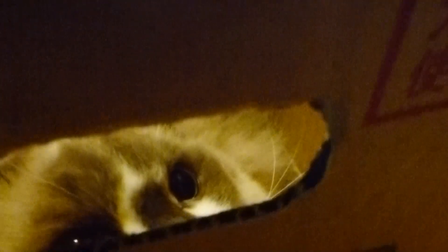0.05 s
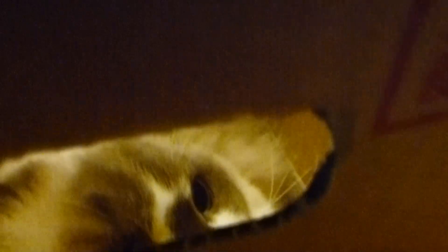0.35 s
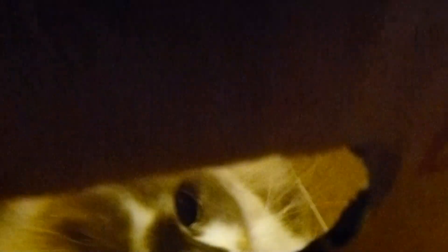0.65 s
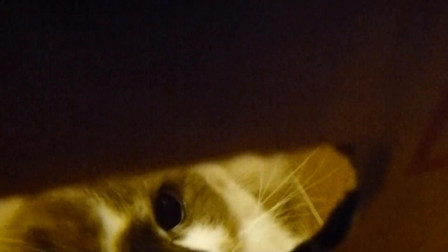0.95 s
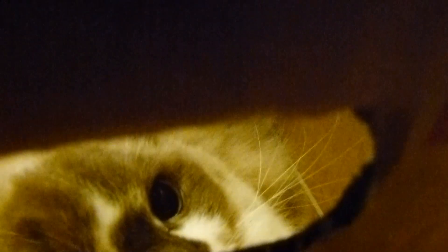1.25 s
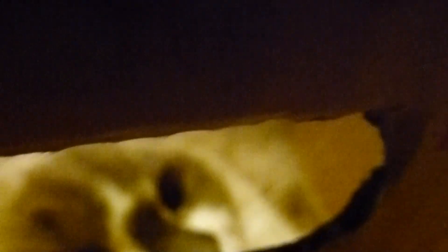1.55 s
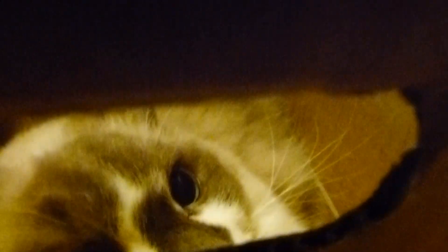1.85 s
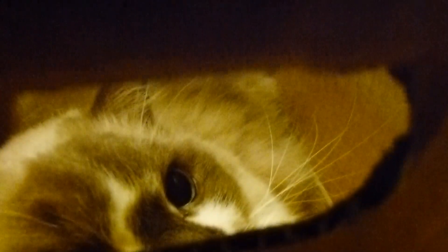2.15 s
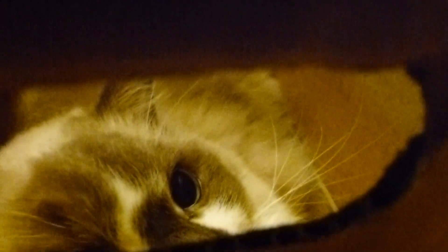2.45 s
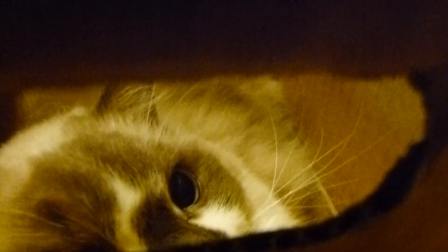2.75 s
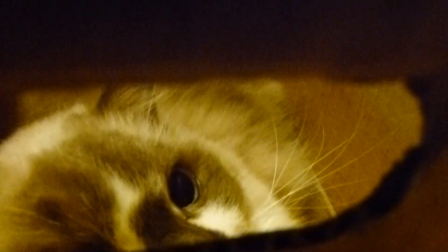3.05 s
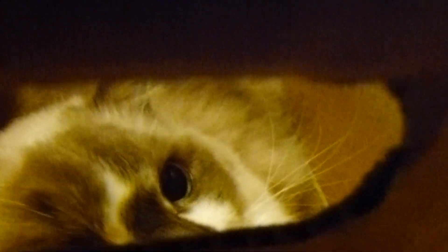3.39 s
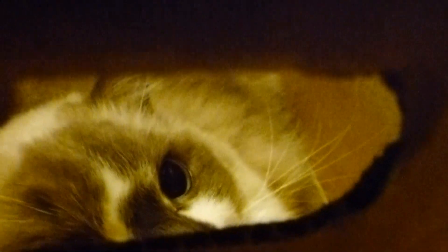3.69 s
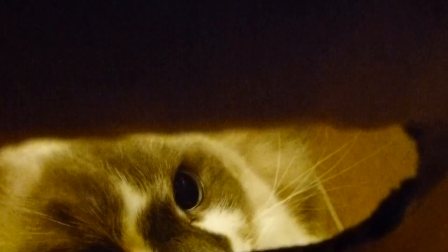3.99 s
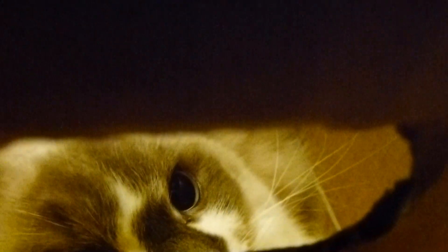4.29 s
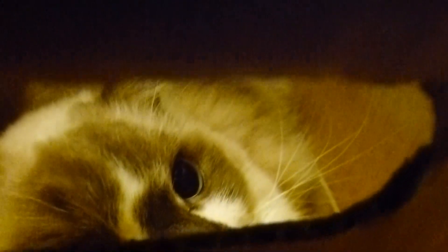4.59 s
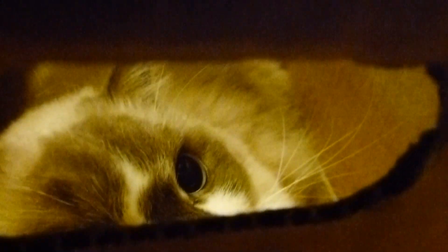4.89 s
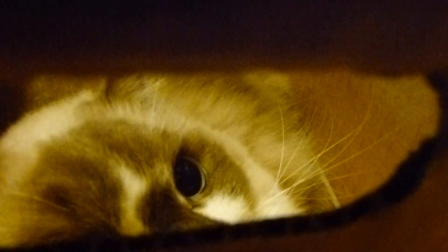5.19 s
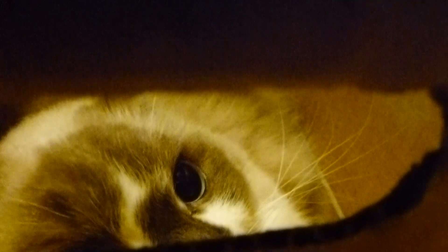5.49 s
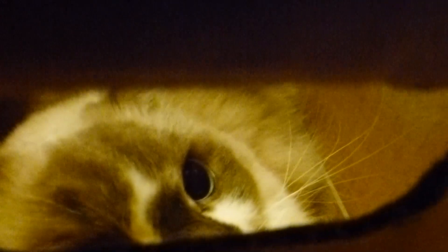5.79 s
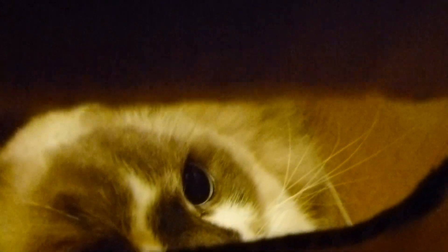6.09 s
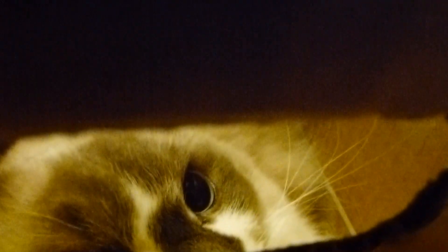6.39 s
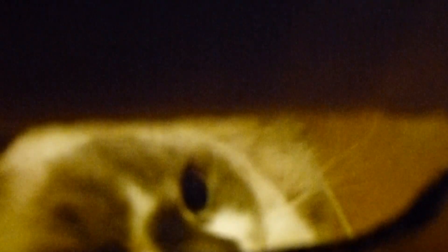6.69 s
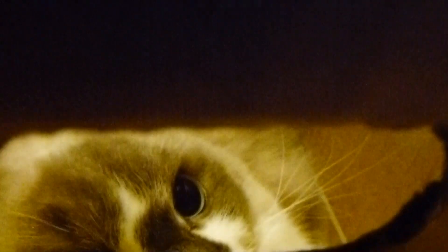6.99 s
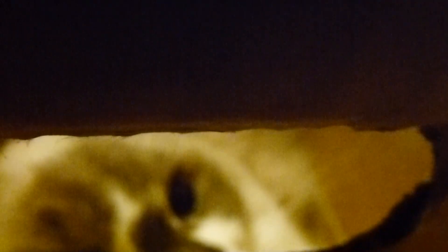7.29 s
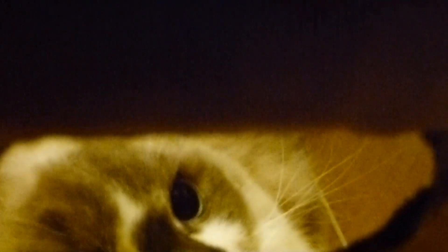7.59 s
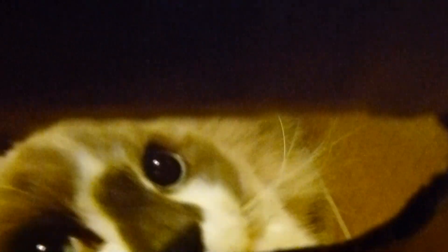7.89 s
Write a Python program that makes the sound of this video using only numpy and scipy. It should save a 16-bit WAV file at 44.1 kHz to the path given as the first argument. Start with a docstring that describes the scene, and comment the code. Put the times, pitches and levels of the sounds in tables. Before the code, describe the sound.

A cat shifts inside a cardboard box, its paws thumping and scraping the walls in short irregular bursts.

```python
"""A cat shifts about inside a cardboard box, close by, in a quiet room.
Its paws thump the walls, which ring briefly. Paws and flank drag over the cardboard, sticking
and slipping in short rasping strokes. Now and then a claw snags with a snap, and fur swishes
along the edge of the hole. A steady room hush lies under it all."""
import sys
import numpy as np
from scipy import signal
from scipy.fft import rfft, irfft
from scipy.io import wavfile
from scipy.ndimage import uniform_filter1d

SR = 44100
rng = np.random.default_rng(int(sys.argv[2]) if len(sys.argv) > 2 else 0)


def wrap_up_sound(samples):
    """Save the sound to the file named by the first command line argument, as 16-bit audio."""
    columns = np.atleast_2d(samples).T
    # keep every value between -1 and 1, then stretch to whole-number steps
    tamed = np.clip(columns, -1, 1)
    steps = np.round(tamed * 32767).astype(np.int16)
    wavfile.write(sys.argv[1], SR, steps)


N = 355005


def paw_thumps(rise_s=0.0014, pad_s=0.00033, wall_db=2.0, vary_db=2, dull_hz=1790):
    """Each paw pushes a wall, which swings a few times; the rest of the box rings along."""
    # Paw blows; a ring time is the time to fade by 60 dB. (time [s], level [dB], wall pitch [Hz],
    # wall ring time [s], high box tones [dB], claw tick [dB], low box tones [dB])
    blows = [(0.736, -1, 258, 0.018, 2, -12, -1), (0.9135, -0.5, 235, 0.026, -5.5, -7.5, -2.5),
             (0.9659, -9.5, 232, 0.031, -0.5, -11, -0.5), (1.004, -26, 258, 0.03, 0, -2, 3),
             (1.4474, -13, 228, 0.039, -20, -21, -3.5), (2.183, -20.5, 225, 0.04, -2, -26, -14),
             (2.3709, -20.5, 234, 0.064, 6, -30, -4), (2.548, -32, 217, 0.054, 11, -16, 1),
             (3.4782, -4.5, 287, 0.024, 1, -3.5, 5), (3.7659, -9, 271, 0.034, 4.5, -8.5, -1.5),
             (3.86, -13, 274, 0.039, 6, -11, -4), (4.0941, -6, 242, 0.026, 1.5, -12, -2.5),
             (4.562, -21.5, 189, 0.05, -1, -9, -8), (4.601, -15.5, 270, 0.064, -17, -34, -5),
             (5.089, -23.5, 258, 0.021, 1, -14, 9.5), (5.149, -28.5, 517, 0.03, -10, -22, 0),
             (5.406, -16, 232, 0.021, -9, -8, -1.5), (5.4988, -4.5, 274, 0.032, -3, -12.5, -10),
             (5.578, -23.5, 287, 0.032, 6, -14, -4), (5.8890, -22.5, 311, 0.052, 8, -16, 3),
             (6.039, -28, 313, 0.045, -3, -26, -5), (6.243, -28, 212, 0.035, -7, -24, 10),
             (6.801, -28, 296, 0.037, 4, -30, 4.5), (7.316, -27, 247, 0.076, 13, -18, -8),
             (7.349, -26.5, 285, 0.045, 5, -28, -3), (7.726, -25.5, 270, 0.037, 3, -26, 6.5),
             (7.9518, -16.5, 245, 0.06, 15.5, -22, -15)]
    # Tones of the box that every thump wakes (pitch [Hz], level [dB], ring time [s])
    box_tones = [(119.8, -31, 0.39), (180.7, -24, 0.12), (252, -24, 0.11), (343.7, -11, 0.078),
                 (420, -13.5, 0.033), (548, -29, 0.11), (713, -15.5, 0.021), (830, -23.5, 0.048),
                 (953, -33.5, 0.052), (1504, -32, 0.023), (3110, -36, 0.0097)]
    # Tone colour of a claw's tick (frequency [Hz], level [dB])
    claw_colour = [(100, -4.5), (400, 19.5), (900, 7.5), (2200, 0.5), (2900, -7.5), (10000, -7)]
    out, t = np.zeros(N), np.arange(SR // 4) / SR
    hz, tone_db, tone_ring_s = np.transpose(box_tones)[:, :, None]
    pad = 1 - np.exp(-t / pad_s)  # the soft pad rounds the start of the blow
    soft_board = signal.butter(1, dull_hz, fs=SR)  # dulls the tick
    for s, db, wall_hz, ring_s, high_db, tick_db, low_db in blows:
        rise = 1 - np.exp(-t / rise_s)
        wall = np.sin(2 * np.pi * wall_hz * t) * amp(wall_db - 60 * t / ring_s) * rise
        detune = 1 + 0.02 * (2 * rng.random(hz.shape) - 1)  # the cat's weight loads the walls anew
        # each spot favours other tones
        spot_db = np.where(hz > 500, high_db + vary_db * rng.standard_normal(hz.shape), low_db)
        tones = np.sin(2 * np.pi * hz * detune * t) * amp(tone_db + spot_db - 60 * t / tone_ring_s)
        tick = signal.lfilter(*soft_board, colour(claw_crack(t), claw_colour))
        thump = amp(tick_db) * tick - wall - pad * tones.sum(0)
        # pushes slower than half its pitch only move air round a light wall
        air_leak = signal.butter(3, 0.5 * wall_hz, "highpass", fs=SR, output="sos")
        add(out, s, amp(db) * signal.sosfilt(air_leak, thump))
    return out


def claw_crack(t, fade_s=0.011, snap_db=10, spray_db=-5):
    """The dry crack of a claw on paper: one snap, then a spray of breaking fibres."""
    spray = np.clip(rng.standard_normal(len(t)), -1, 1) * amp(spray_db - 60 * t / fade_s)
    return spray - amp(snap_db) * (t == 0)


def scrapes(rasp_db=3.0, hiss_db=1.0, rib_hz=3200, echo_db=-9, echo_s=0.0015, uneven_db=1.34):
    """A paw or flank drags: coarse slips drum the walls and rasp on the board; finer ones hiss."""
    # Dragging strokes (start [s], length [s], rasp [dB], drumming [dB], hiss against the rasp [dB],
    # swell from start to end [dB], wall pitch [Hz], wall ring [dB], hollow ring [dB])
    strokes = [ (0.73, 0.007, -14, -41, -11.5, -4.5, 370, 0, 2),
               (0.829, 0.065, -36, -30.5, -13.5, 15, 362, -2, -1.5),
               (1.026, 0.02, -39.5, -33.5, -18, 5, 240, -8, 5),
               (1.068, 0.021, -35.5, -30, -23, 1.5, 256, -9, 6),
               (1.101, 0.083, -41.5, -37, -16, 7, 227, -6, -4),
               (1.168, 0.022, -28.5, -25.5, -18, 0.5, 210, 7, 0),
               (1.462, 0.021, -46.5, -36, -20, 7, 166, 26, 15),
               (1.792, 0.074, -28, -30.5, -19, 7.5, 235, -5, 5.5),
               (1.966, 0.048, -40.5, -35, -14, -5, 249, -12, 0),
               (2.006, 0.077, -31.5, -30, -17, -4.5, 442, -1, -4),
               (2.157, 0.076, -35.5, -27, -17, -10.5, 215, -2, -6),
               (2.216, 0.170, -49, -37.5, -15.5, -0.5, 235, 4, -2),
               (3.455, 0.12, -51, -39.5, -17, -20, 346, 16, -4),
               (3.607, 0.044, -46, -37.5, -22, -2, 300, 11.5, -19),
               (3.763, 0.086, -47.5, -30.5, -22, 7, 288, 4, -6),
               (3.826, 0.048, -39.5, -33.5, -20, 6.5, 284, 11, -16),
               (3.887, 0.1, -49.5, -40, -23, -9, 308, -7, -10),
               (4.108, 0.071, -49, -33.5, -16, -8, 235, 5, 2),
               (4.18, 0.25, -56.5, -40, -14, 9, 295, 1, -14),
               (4.429, 0.11, -37.5, -30.5, -14.5, -3.5, 171, -9, -7),
               (4.535, 0.033, -34.5, -30.5, -15.5, 0.5, 240, -16, -11),
               (4.577, 0.035, -38.5, -29.5, -13, -1, 180, -11, -20),
               (5.504, 0.1, -49.5, -33, -20, -8, 306, 20, -12),
               (5.609, 0.22, -53.5, -36, -18, 11.5, 293, 21, -11),
               (6.014, 0.28, -53, -40.5, -17, 12, 283, 4, -2),
               (6.216, 0.14, -44, -34.5, -28, 1, 222, 8, 5.5),
               (6.567, 0.066, -44.5, -40, -14.5, 6, 154, 12, -4),
               (7.247, 0.074, -48.5, -39, -17, -2, 266, 26, 1),
               (7.865, 0.071, -36.5, -27, -14, -14, 263, 13, -3),
               (7.922, 0.044, -33.5, -27, -16, -2.5, 241, 11, -6), ]
    # Tone colour of the drumming walls (frequency [Hz], level [dB])
    drum_colour = [(40, -71), (95, -29.5), (140, -3.5), (190, 1), (240, 1.5), (300, -2), (345, 3.5),
                   (390, -4.5), (470, -5), (570, -12.5), (900, -61)]
    # Tone colour of the rasping board (frequency [Hz], level [dB])
    rasp_colour = [(420, -38), (580, -8), (740, -0.5), (1020, -3), (1200, -10.5), (1450, -15.5),
                   (1750, -12), (2250, -18), (2520, -23.5), (3400, -19.5), (3850, -31.5), (11000, -48)]
    # Tone colour of the hissing paper fibres (frequency [Hz], level [dB])
    fibre_colour = [(1200, -16.5), (2600, -9), (3900, 0), (4350, 5.5), (4750, 3), (6200, 0), (6800, -7.5),
                    (7700, 0.5), (10500, -6)]
    # The hollow ring of rubbed board (pitch [Hz], width [Hz], level [dB])
    hollow_tones = [(767, 18, -1), (830, 26, 9.5), (912, 71, 0)]
    # A whistle in the hiss, rising as the cat shifts its place (time [s], pitch [Hz])
    whistle_path = [(1.2, 5150), (1.8, 6300)]
    drum_level, rasp_level, hiss_level = np.zeros((3, N))
    spot = np.zeros((N, 4))  # how the rubbed spot rings and echoes, held until the next stroke
    for s, length, board_db, push_db, fibre_db, swell_db, *ringing in strokes:
        speed = stroke_speed(length, swell_db)
        spot[round(s * SR):] = *ringing, echo_s * (1 + rng.random())
        add(drum_level, s, amp(push_db) * speed ** 0.57)  # drumming grows more slowly than speed
        add(rasp_level, s, amp(board_db) * speed)
        add(hiss_level, s, amp(board_db + fibre_db) * speed)
    wall_hz, wall_db, hollow_db, delay_s = spot.T
    t, bursts = np.arange(N) / SR, catches()
    coarse = slips(per_s=3800, spread_db=1.5) * bursts
    fine = unit(slips(per_s=20000, spread_db=-16.0) * bursts) + 0.16 * unit(coarse)
    walls = colour(coarse, drum_colour)
    board = colour(coarse, rasp_colour)
    fibres = colour(fine, fibre_colour)
    # the echo off the facing wall colours each spot differently
    board, fibres = (x + amp(echo_db) * np.interp(t - delay_s, t, x) for x in (board, fibres))
    bend = 1 + 0.028 * wander(rate_hz=7.8)  # the board flexes under the cat, and its tones move
    drum = steady_power(walls + amp(wall_db) * resonate(walls, wall_hz, width_hz=48))
    hollow = sum(amp(db) * resonate(board, hz * bend, width) for hz, width, db in hollow_tones)
    rasp = steady_power(board + amp(hollow_db) * hollow)
    whistle = resonate(fibres, np.interp(t, *np.transpose(whistle_path)) * bend, width_hz=420)
    ribs = resonate(fibres, rib_hz * bend, width_hz=300)  # the ridges in the cardboard ring
    hiss = steady_power(fibres + amp(3) * whistle + amp(10) * ribs)
    pressure = amp(uneven_db * wander(rate_hz=25))  # the cat never leans quite evenly
    jerks = shudder(rasp_level)
    return pressure * (drum_level * drum
                       + amp(rasp_db) * rasp_level * rasp * jerks
                       + amp(hiss_db) * hiss_level * hiss * np.sqrt(jerks))


def stroke_speed(length, swell_db, start_s=0.031, stop_s=0.063):
    """Speed of one stroke: a soft start, a steady swell or fade, a quick stop."""
    t = np.arange(0, length + 2 * stop_s, 1 / SR)
    start = np.sin(np.pi / 2 * np.minimum(t / start_s, 1)) ** 2
    glide_db = swell_db * (np.minimum(t / length, 1) - .5)
    return start * amp(glide_db - 60 * np.maximum(t - length, 0) / stop_s)


def slips(per_s, spread_db):
    """Rubbing surfaces stick and slip: a train of tiny clicks of uneven size."""
    size = amp(spread_db * np.minimum(rng.exponential(1, N), 4)) * rng.choice([-1, 1], N)
    return size * (rng.random(N) < per_s / SR)


def catches(rate_hz=360, unsteady=0.41, let_go_cycles=0.54, between_db=-9):
    """The paw catches and lets go a few hundred times a second, never quite in step."""
    cycles = np.cumsum(rate_hz * np.exp(unsteady * wander(rate_hz=150))) / SR
    return amp(between_db) + np.exp(-(cycles % 1) / let_go_cycles)


def shudder(level, rate_hz=58, unsteady=0.29, depth_db=2.5, firm_db=-27):
    """Under a firm paw the board grips and skids in coarse jerks; a light one slides evenly."""
    cycles = np.cumsum(rate_hz * np.exp(unsteady * wander(rate_hz=29.6))) / SR
    firmness = np.minimum(level / amp(firm_db), 1)
    return amp(depth_db * firmness * (np.sin(2 * np.pi * cycles) - 0.28))


def steady_power(x, span_s=0.036):
    """The paw keeps its pressure: clicks stay uneven while their average power holds at 1."""
    power = abs(uniform_filter1d(x ** 2, int(span_s * SR)))
    return x / np.sqrt(power + 1e-12)


def claw_snags():
    """A claw tears free of the paper: a crisp snap, mostly louder on one side."""
    # Moments when a claw catches (time [s], level [dB], lean to the left [dB])
    snags = [(0.7568, -16.5, 2), (0.883, -26, 2), (1.185, -37, -2), (3.478, -21, -11), (4.442, -31, 2),
             (4.564, -34, 0)]
    # Tone colour of the snap (frequency [Hz], level [dB])
    snap_colour = [(1500, -3), (4000, -12), (5400, 1), (6600, -4), (8600, -11.5), (10400, -3)]
    out, t = np.zeros((2, N)), np.arange(SR // 10) / SR
    for s, db, lean_db in snags:
        snap = colour(claw_crack(t, fade_s=0.0087, snap_db=9.5, spray_db=-2.5), snap_colour)
        add(out[0], s, amp(db + lean_db) * snap)
        add(out[1], s, amp(db - lean_db) * snap)
    return out


def fur_swishes():
    """Countless hairs flick past the cut edge of the hole: a soft, high swell."""
    # Brushes of fur (loudest moment [s], length [s], level [dB])
    brushes = [(3.49, 0.2, -55.5), (3.642, 0.067, -51.5), (3.9, 0.31, -56.5), (5.416, 0.046, -57.5),
               (5.513, 0.09, -59), (5.765, 0.48, -60.5), (6.283, 0.16, -54.5)]
    # Tone colour of the flicking hairs (frequency [Hz], level [dB])
    fur_colour = [(3000, -33), (5700, 6.5), (6600, 11), (8000, 1.5), (9300, 11), (10600, 0)]
    level = np.zeros(N)
    for s, length, db in brushes:
        add(level, s - length / 2, amp(db) * np.hanning(int(length * SR)))
    return level * unit(colour(slips(per_s=4000, spread_db=-6), fur_colour))


def flap_echoes(x, fade_s=0.027, delay_s=0.001):
    """Adds quick echoes off the flaps; they reach the two sides differently, most in the treble."""
    # Strength of the echoes that differ between left and right (frequency [Hz], level [dB])
    side_colour = [(60, -10), (200, -52), (400, -18.5), (800, -15.5), (1400, -13), (2500, -10.5),
                   (5000, -5.5), (10000, -1)]
    t = np.arange(1024) / SR
    spectrum = rfft(rng.standard_normal(len(t)) * amp(-60 * t / fade_s) * (t > delay_s))
    echoes = irfft(spectrum / abs(spectrum))  # equally strong at every pitch
    side = colour(signal.oaconvolve(x, echoes)[:N], side_colour)
    return np.array([x + side, x - side])


def room_echo(x, delay_s=0.0066):
    """A small furnished room: a short wash of echoes that lasts longest in the treble."""
    # How long the room rings (frequency [Hz], time to fade by 60 dB [s])
    ring_times = [(100, 0.2), (300, 0.039), (1000, 0.14), (4000, 0.38), (10000, 0.57)]
    hz, t, bands = signal.stft(rng.standard_normal((2, SR // 2)), SR, nperseg=256)
    fade = amp(-60 * t / read(ring_times, hz)[:, None])
    tail = signal.istft(bands * fade, SR, nperseg=256)[1]
    tail *= np.arange(tail.shape[1]) > delay_s * SR
    return signal.fftconvolve(x[None], tail / np.linalg.norm(tail[0]), axes=1)[:, :N]


def room_hush(level_db=-44):
    """Steady room noise, centred in the bass and very wide in the treble."""
    # Tone colour of the hush (frequency [Hz], level [dB])
    hush_colour = [(20, -14.5), (70, -9), (140, 0.5), (300, 1), (410, -3.5), (570, 0), (760, -6.5),
                   (1150, -14.5), (1900, -18.5), (4400, -26), (10500, -29.5)]
    # How alike the left and right sides are (frequency [Hz], likeness [-1 to 1])
    likeness = [(60, 0.49), (130, 0.86), (270, 0.72), (560, 0.6), (1180, -0.45), (2490, -0.54),
                (5240, -0.5), (11000, 0.35)]
    hz = np.fft.rfftfreq(N, 1 / SR)
    left, other = rfft(rng.standard_normal((2, N)))
    same = read(likeness, hz)
    right = same * left + np.sqrt(1 - same ** 2) * other
    spectrum = np.array([left, right]) * amp(read(hush_colour, hz)) / np.sqrt(1 + same)
    return amp(level_db) * unit(irfft(spectrum, N))


def amp(db):
    """Turns decibels into a gain."""
    return 10 ** (np.asarray(db) / 20)


def unit(x):
    """Scales a sound to an average power of 1."""
    return x / np.sqrt(np.mean(x ** 2) + 1e-20)


def read(points, hz):
    """Reads between the rows of a table, giving each octave equal room."""
    row_hz, value = np.transpose(points)
    return np.interp(np.log(hz + 1), np.log(row_hz + 1), value)


def add(mix, s, sound):
    """Mixes a sound in at s seconds."""
    part = mix[round(s * SR):][:len(sound)]
    part += sound[:len(part)]


def colour(x, spectrum, size=4096):
    """Gives a sound a tone colour, with a filter that rings after each click, never before."""
    log_gain = np.log(amp(read(spectrum, abs(np.fft.fftfreq(size, 1 / SR)))))
    ring = np.fft.ifft(np.exp(np.conj(signal.hilbert(log_gain)))).real[:size // 2]
    return signal.oaconvolve(x, ring)[:len(x)]


def wander(rate_hz):
    """A smooth random drift of average power 1, with little motion faster than the given rate."""
    hz = np.fft.rfftfreq(N, 1 / SR)
    return unit(irfft(rfft(rng.standard_normal(N)) * np.exp(-(hz / rate_hz) ** 2), N))


def resonate(x, hz, width_hz):
    """Makes a sound ring at a pitch that follows the curve hz."""
    turn = np.exp(2j * np.pi * np.cumsum(hz) / SR)
    decay = np.exp(-np.pi * width_hz / SR)
    return 2 * (turn * signal.lfilter([1 - decay], [1, -decay], x / turn)).real


def scene(room_db=-20, balance_db=0.28, treble_hz=1000):
    """The box, a little to the left, in its room; its treble leans further left."""
    # Lean of the treble, added on the left and taken off the right (time [s], lean [dB])
    treble_lean = [(1.2, 2.2), (2.2, 0.6)]
    box = paw_thumps() + scrapes() + fur_swishes()
    snaps = claw_snags()
    heard = flap_echoes(box) + snaps + amp(room_db) * room_echo(box + snaps.mean(0))
    treble = signal.sosfiltfilt(signal.butter(1, treble_hz, "highpass", fs=SR, output="sos"), heard)
    sides = np.array([[1], [-1]])
    lean_db = np.interp(np.arange(N) / SR, *np.transpose(treble_lean))
    return (heard - treble) * amp(sides * balance_db) + treble * amp(sides * lean_db) + room_hush()


def record(dry, low_cut_hz=52, high_cut_hz=10700):
    """A small microphone sheds the deep bass; then the highest treble is cut off."""
    thin = signal.sosfilt(signal.butter(2, low_cut_hz, "highpass", fs=SR, output="sos"), dry)
    high_cut = signal.firwin(511, high_cut_hz, window=("kaiser", 9), fs=SR)
    return signal.oaconvolve(thin, high_cut[None], "same")


dry = scene()
out = record(dry)
wrap_up_sound(out)
```